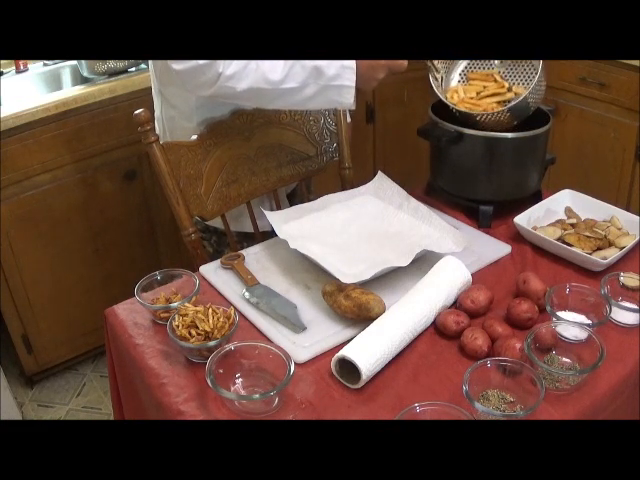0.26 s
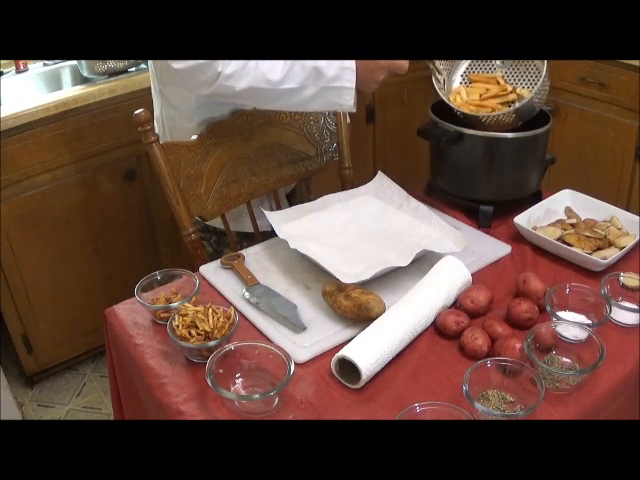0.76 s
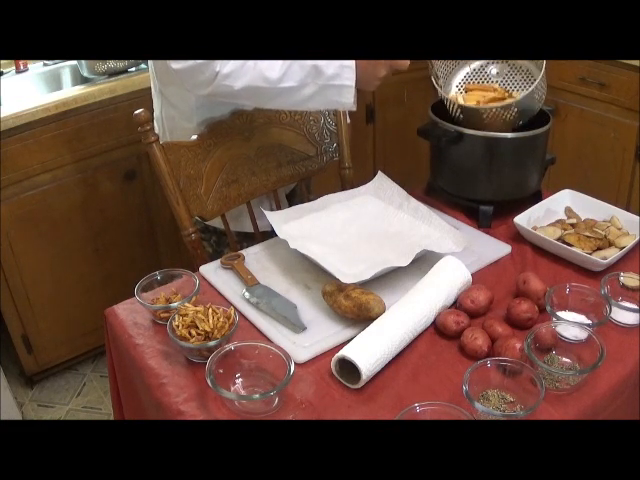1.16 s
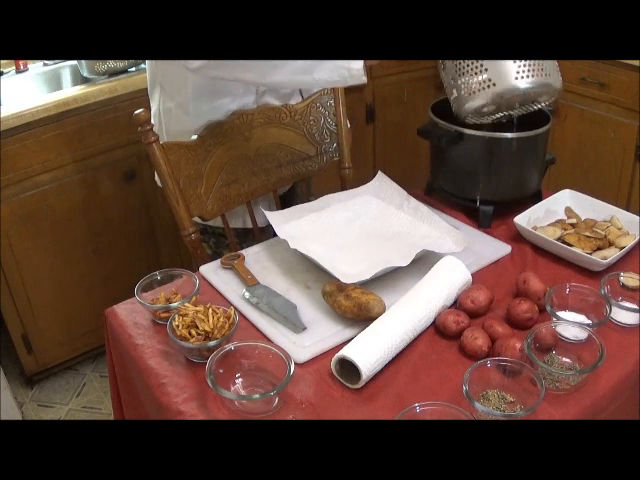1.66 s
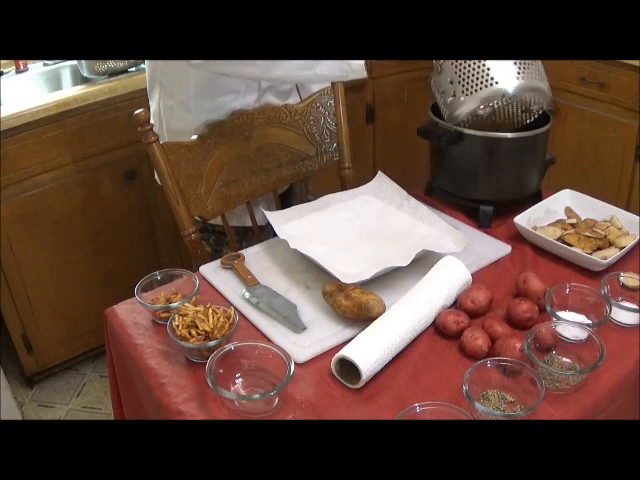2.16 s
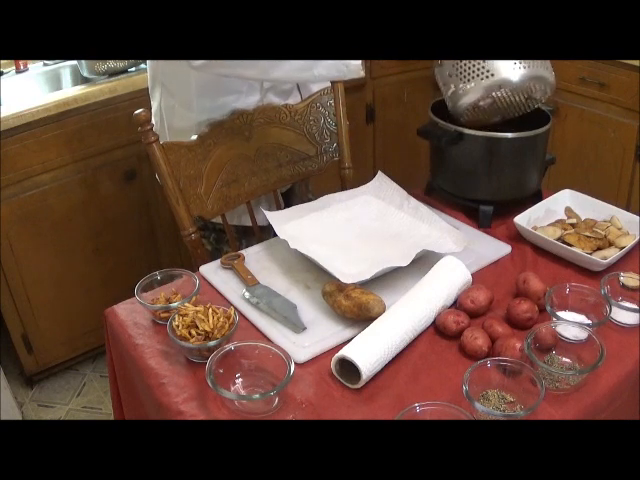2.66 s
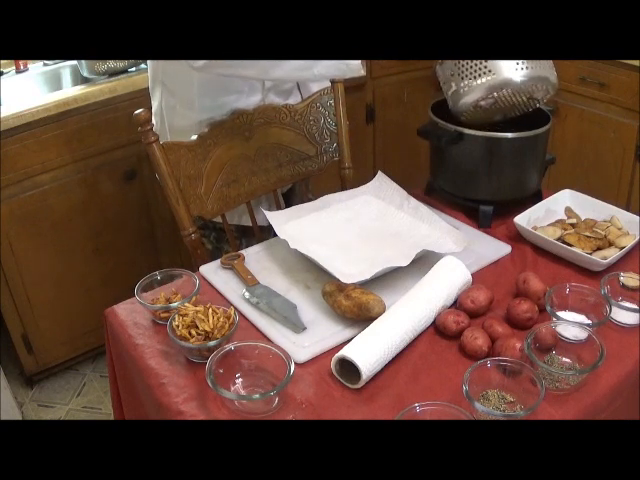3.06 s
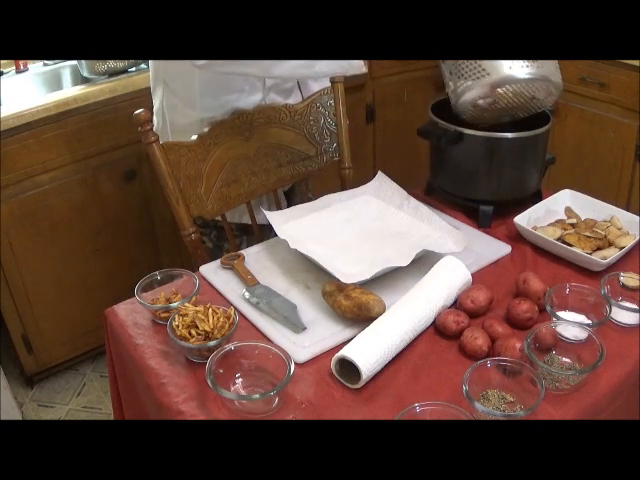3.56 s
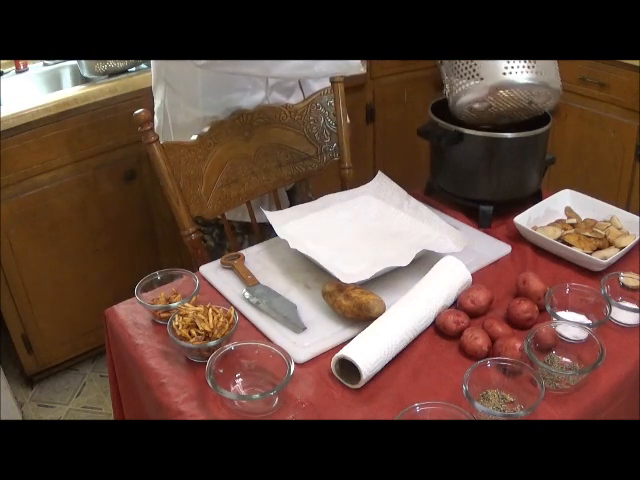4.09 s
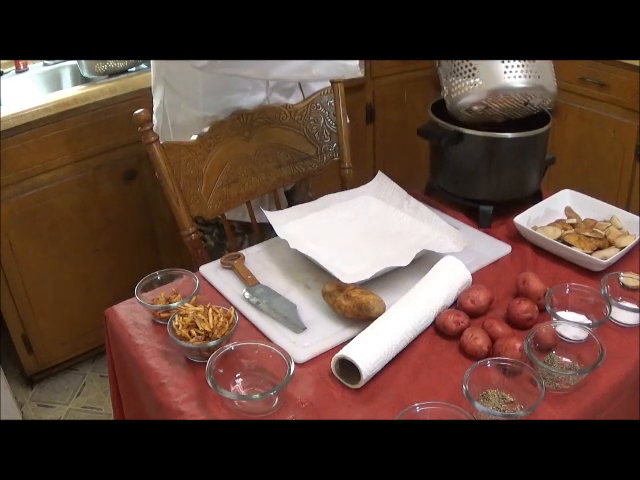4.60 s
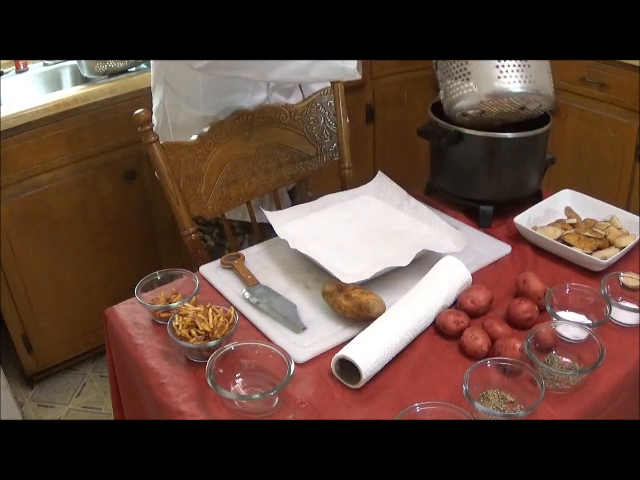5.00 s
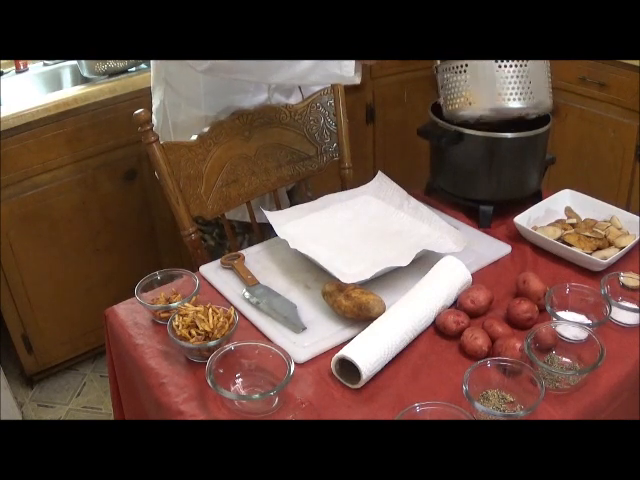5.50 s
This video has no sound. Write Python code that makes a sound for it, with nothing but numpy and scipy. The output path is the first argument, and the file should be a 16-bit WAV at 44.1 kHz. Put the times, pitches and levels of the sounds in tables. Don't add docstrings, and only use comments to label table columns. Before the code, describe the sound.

Fried potato sticks rattle in a perforated metal basket, tip into a deep pot with hollow knocks, then get shaken harder with bright clattering slaps.

```python
import sys
import numpy as np
from scipy import signal
from scipy.fft import rfft, irfft, next_fast_len
from scipy.io import wavfile
from scipy.ndimage import uniform_filter1d

SR = 44100
rng = np.random.default_rng(int(sys.argv[2]) if len(sys.argv) > 2 else 0)


def unload_audio(sound):
    columns = np.transpose(np.atleast_2d(sound))
    steps = np.round(np.clip(columns, -1, 1) * 32767)
    wavfile.write(sys.argv[1], SR, steps.astype(np.int16))


def field_ratio(decibels):
    return 10 ** (np.asarray(decibels, dtype=float) / 20)


N = 253115


def evened(x):
    return x / np.sqrt(np.mean(x ** 2) + 1e-20)


def read(points, hz, column=1):
    table = np.array(points, float)
    return np.interp(np.log(hz + 1), np.log(table[:, 0] + 1), table[:, column])


def curve(table):
    return np.interp(np.arange(N) / SR, *np.transpose(table), -150, -150)


def add(mix, s, sound):
    part = mix[round(s * SR):][:len(sound)]
    part += sound[:len(part)]


def high_pass(x, order, hz):
    return signal.sosfilt(signal.butter(order, hz, "high", fs=SR, output="sos"), x)


def colour(x, points):
    hz = abs(np.fft.fftfreq(8192, 1 / SR))
    log_gain = np.log(field_ratio(np.maximum(read(points, hz), -100)))
    taps = np.fft.ifft(np.exp(np.conj(signal.hilbert(log_gain)))).real[:3000]
    return signal.oaconvolve(x, taps / np.linalg.norm(taps))[:len(x)]


def resonate(x, hz, width):
    return signal.lfilter(*signal.iirpeak(hz, hz / width, SR), x)


def tipped():
    middle_s, move_s = 1.78, 0.34
    return np.clip((np.arange(N) / SR - middle_s) / move_s + .5, 0, 1)


# pitch_hz, density_db (per Hz)
AIR_SPECTRUM = [(15, -31), (60, -5), (125, -11), (165, -3.5), (210, -8), (500, -5), (1200, -9), (2050, -9),
                (2800, -10), (3600, -8.5), (4600, -9), (5700, -10.5), (9600, -16), (15500, -25)]
# pitch_hz, likeness (0 to 1)
AIR_LIKENESS = [(60, 0.98), (180, 0.75), (550, 0.53), (1650, 0.23), (4970, 0.65), (15000, 0.97)]


def air():
    level_db = -49
    frames, hz = N // 256 + 5, np.fft.rfftfreq(1024, 1 / SR)
    a, b, c, d, patches = rng.standard_normal((frames, 513, 5)).T
    patches = uniform_filter1d(uniform_filter1d(patches, 12, 0), 12, 1)
    same = np.clip(read(AIR_LIKENESS, hz), -1, .97)[:, None]
    left = a + 1j * b
    right = same * left + np.sqrt(1 - same ** 2) * (c + 1j * d)
    z = np.array([left, right]) * field_ratio(read(AIR_SPECTRUM, hz)[:, None] + evened(patches))
    return field_ratio(level_db) * evened(signal.istft(z, nperseg=1024, noverlap=768)[1][:, :N])


# pitch_hz, width_hz, level_db
HOUSING = [(2750, 580, -0.049), (4130, 340, -1), (4930, 120, 1.8)]
# pitch_hz, level_db
HUM_TONES = [(120, -76), (177, -71), (240, -71), (960, -69), (1320, -69)]


def lamp():
    snap_hz, buzz_db = 119.98, -56.5
    late_db = 2.5
    t = np.arange(N) / SR
    pulses = sum(np.cos(2 * np.pi * k * snap_hz * t) for k in range(15, 46))
    buzz = sum(field_ratio(db) * resonate(resonate(pulses, hz, width), hz, width) for hz, width, db in HOUSING)
    hum = np.zeros(N)
    for hz, db in HUM_TONES:
        waver = 1 + 1.72 * evened(uniform_filter1d(rng.standard_normal(N), 3000))
        hum += field_ratio(db) * waver * np.sin(2 * np.pi * hz * t)
    return field_ratio(buzz_db + late_db * tipped()) * evened(buzz) + hum


# pitch_hz, decay_t60_s, level_db
WALL_ECHOES = [(100, 0.92, -13), (400, 0.47, 1), (980, 0.34, -3), (2140, 0.38, 0.5), (5570, 0.35, -5.5),
               (8500, 0.17, -1.5), (12700, 0.22, -2.5)]
# pitch_hz, share (0 to 1)
SHARED_ECHOES = [(300, 0.92), (600, 0.94), (1200, 0.69), (2500, 0.73), (5000, 0.57), (9000, 0.74),
                 (11000, 0.95)]


def kitchen(x, count=3):
    out, size = np.zeros((2, N)), SR // 3
    for k in range(count):
        taps = np.zeros((3, size))
        at = np.arange(90, size - 20, 20) + rng.integers(0, 20, (3, (size - 91) // 20))
        np.put_along_axis(taps, at, rng.choice([-1., 1.], at.shape), 1)
        hz, t, z = signal.stft(taps, SR, nperseg=256)
        shared = np.clip(read(SHARED_ECHOES, hz), 0, 1)[:, None]
        z = shared * z[2] + np.sqrt(1 - shared ** 2) * z[:2]
        t60 = read(WALL_ECHOES, hz)[:, None]
        db = read(WALL_ECHOES, hz, column=2)[:, None]
        z *= field_ratio(db - 60 * t / t60) / np.sqrt(t60 * 160)
        echoes = signal.istft(z, SR, nperseg=256)[1]
        turn = np.sqrt(2 / count) * np.cos(np.pi * (np.arange(N) / SR * 3.1 + k / count))
        out += signal.oaconvolve((x * turn)[None], echoes, axes=1)[:, :N]
    return out


# start_s, effort_db
EFFORT_CURVE = [(0, -38.5), (.11, -44.5), (.82, -47), (.99, -36), (1.13, -45.5), (1.26, -73), (1.7, -56),
                (1.93, -32), (2.08, -45), (2.4, -49), (2.81, -38.5), (3.32, -33.5), (3.72, -27.5),
                (4.27, -32.5), (4.46, -32.5), (4.62, -35), (5.2, -28), (5.44, -49.5)]


def low_effort_db():
    upright_db, tipped_db = -13.5, -6
    return curve(EFFORT_CURVE) + upright_db + (tipped_db - upright_db) * tipped()


# pitch_hz, density_db (per Hz)
COUNTER_SPECTRUM = [(30, -37), (80, -12.5), (165, 1), (250, -5), (420, -14), (800, -45)]


def rumble():
    return colour(rng.standard_normal(N) * field_ratio(low_effort_db() - 21.0), COUNTER_SPECTRUM)


# start_s, peak_db, pitch_hz, decay_t60_s
POT_AND_RIM_KNOCKS = [(0.684, -38.5, 690, 0.13), (.703, -39, 700, .1), (0.725, -31.5, 660, 0.11),
                      (.748, -39, 770, .12), (1.571, -41, 1340, 0.1), (1.902, -13.5, 665, 0.046),
                      (1.917, -15.5, 765, 0.14), (2.019, -19.5, 800, 0.17), (2.186, -17, 970, 0.043),
                      (2.209, -27, 940, 0.21), (2.308, -32.5, 1226, 0.086), (1.932, -15.5, 3290, 0.066),
                      (1.9, -24, 3000, 0.088), (1.985, -18, 1500, 0.073), (1.95, -19, 1200, 0.081),
                      (2.03, -21, 1400, .06), (4.25, -21.5, 985, .12), (2.615, -30, 985, .12),
                      (2.735, -27, 985, .08), (3.36, -22, 985, 0.12), (3.385, -21.5, 760, 0.088),
                      (3.812, -17.5, 990, 0.18), (3.3, -19, 1400, 0.11), (3.165, -21.5, 985, 0.15),
                      (2.205, -23.5, 984, 0.11), (2.006, -22, 2344, 0.051), (4.054, -16, 1190, 0.046),
                      (4.192, -26, 990, 0.17), (2.71, -21, 870, 0.034), (5.5908, -32, 1233, 0.07),
                      (5.591, -26.5, 750, 0.03), (5.601, -37, 920, .05), (5.613, -35, 1200, 0.056),
                      (5.591, -32, 1600, 0.027), (5.604, -28.5, 1220, 0.055)]
# start_s, peak_db, pitch_hz, decay_t60_s
COUNTER_THUMPS = [
    (1.896, -29, 359, 0.25),
    (1.929, -35.5, 331, 0.56),
    (1.948, -35.5, 66, 0.6),
    (2.021, -19.5, 371, 0.081),
    (2.049, -33, 152, 0.38),
    (2.191, -59, 352, 0.19),
    (5.706, -39, 190, 0.045),
]


def knocks():
    out, t = np.zeros(N), np.arange(SR // 3) / SR
    neighbours = [(0.732, -4.0), (0.595, -14.0), (1.1, -8.0)]
    for s, db, hz, t60 in POT_AND_RIM_KNOCKS + COUNTER_THUMPS:
        near = sum(field_ratio(d - 60 * t / t60) * np.sin(2 * np.pi * hz * k * t) for k, d in neighbours)
        rise = np.minimum(t * hz / 1.46, 1)
        decay = field_ratio(db - 7.0 - 60 * t / t60)
        add(out, s, decay * rise * (np.sin(2 * np.pi * hz * t) + near))
    return high_pass(out, 2, 50)


# start_s, peak_db, pitch_hz
EDGE_SNAPS = [(0.0282, -14.5, 6370), (0.194, -12.5, 5900), (0.378, -14.5, 2330), (0.9252, -3.5, 6240),
              (0.9335, -5.5, 6040), (1.8944, -21, 3800), (2.1093, -14, 5640), (2.307, -16, 4220),
              (2.5052, -11.5, 3370), (2.9958, -13, 3340), (3.0732, -14, 3340), (3.1546, 0, 5900),
              (3.332, -5, 5840), (3.3547, -15, 3210), (3.3664, -9, 4500), (3.43, -8, 4160),
              (3.5258, -6, 3100), (3.546, -5, 9170), (3.5677, -20, 4670), (3.6523, -7, 3700),
              (3.6932, -9, 2750), (3.7088, -5, 4250), (3.7939, -18, 3420), (3.851, -14, 1800),
              (3.874, -5, 3250), (3.8908, -9, 3230), (3.9438, -1, 5100), (4.0566, -24, 2220),
              (4.0767, -3, 3700), (4.0948, -8, 6520), (4.1614, -22, 4070), (4.1908, -6, 3620),
              (4.255, -5, 3400), (4.342, -9, 3100), (4.4054, -2, 3630), (4.438, -15, 3190),
              (4.4803, -17, 3660), (4.4924, -18, 3640), (4.5539, -16.0, 8140), (4.5878, -2, 3400),
              (4.7044, -10, 3800), (4.7655, -17.0, 3960), (4.803, -8, 6240), (4.87, -14.0, 4390),
              (4.9708, -15, 5280), (5.016, -7, 3510), (5.1393, -10, 5200), (5.166, -2, 8800),
              (5.193, -19, 2930), (4.2399, -2.5, 3100), (4.4165, -2, 4540), (3.7495, -9, 5000),
              (5.59, -27, 1410), (5.2044, -7, 4500), (4.024, -7, 4200), (4.0455, -8, 3740),
              (4.06, -2, 5500), (1.9865, -4, 4200), (2.0062, 1, 4500), (1.9675, 2, 3880)]


def snaps():
    level_db, cycles = -7, 2.3
    out, t = np.zeros(N), np.arange(300) / SR
    for s, db, hz in EDGE_SNAPS:
        add(out, s, field_ratio(db + level_db) * np.exp(-t * hz / cycles) * np.sin(2 * np.pi * hz * t))
    return high_pass(out, 2, 900)


# start_s, peak_db, brightest_hz, spread_s
WALL_THROWS = [(0.795, -18.5, 4610, 0.0037), (0.8037, -18.5, 5140, 0.038), (.861, -19.5, 5140, 0.012),
               (1.0082, -20, 5450, 0.011), (1.1056, -21, 6550, 0.015), (1.8611, -26, 3350, 0.013),
               (1.9319, -8, 3300, 0.01), (2.0426, -4.5, 3800, 0.0086), (2.388, -25, 3060, 0.018),
               (2.6841, -23.5, 3020, 0.01), (2.7922, -14, 3950, 0.011), (2.9701, -11.5, 3420, 0.0047),
               (3.0566, -19, 3720, 0.014), (3.073, -18.5, 4300, 0.0059), (3.1522, -9, 3550, 0.016),
               (3.5055, -6.5, 5240, 0.0086), (3.749, -14.5, 5070, 0.007), (3.8728, -4.5, 2530, 0.014),
               (4.145, -17, 3470, 0.0066), (4.2515, -8.5, 3340, 0.023), (4.4159, -11.5, 3360, 0.042),
               (4.438, -10.5, 3350, 0.018), (4.5221, -21, 4470, 0.05), (4.5451, -17, 5950, 0.022),
               (4.587, -12.5, 3140, 0.03), (4.6811, -21, 3570, 0.011), (4.837, -17, 5000, 0.05),
               (4.982, -10, 3350, 0.019), (5.165, -12.5, 3140, 0.0087), (5.2049, -9, 3080, 0.011)]
# start_s, peak_db, brightest_hz, spread_s
BOTTOM_DROPS = [(0.0265, -23.5, 5900, 0.0036), (0.063, -22.5, 3280, 0.016), (0.1323, -31, 2530, 0.0076),
                (0.2505, -23, 3500, 0.027), (.431, -24.5, 5050, 0.022), (0.6125, -26, 3550, 0.019),
                (0.6797, -27.5, 3900, 0.0098), (0.832, -35, 6090, .02), (.9776, -19.5, 3820, 0.021),
                (1.571, -35.5, 3740, 0.019), (1.7223, -31.5, 4330, 0.019), (2.1867, -18, 2950, 0.024),
                (2.3368, -31, 2900, .012), (2.583, -24, 3670, .0076), (2.6045, -20.5, 5200, 0.0092),
                (2.727, -21.5, 6500, 0.047), (2.9043, -23.5, 4460, 0.011), (2.9958, -19.5, 3160, 0.032),
                (3.3524, -15, 3800, 0.018), (3.7827, -10.5, 3150, 0.0045), (3.81, -16, 3460, 0.058),
                (4.024, -15, 3330, 0.01), (4.049, -10, 2640, 0.015), (4.1879, -15.5, 4600, 0.0063),
                (4.234, -11.5, 3050, 0.011), (4.9593, -16.5, 3860, 0.012), (5.0141, -23, 3770, 0.005),
                (5.1394, -17.5, 3160, 0.017)]
# start_s, peak_db, brightest_hz, spread_s
HIGH_GLANCES = [(0.192, -19, 6000, 0.015), (.5337, -12.5, 5760, 0.0038), (.897, -21, 4000, 0.02),
                (0.9218, -16, 6000, 0.0081), (0.932, -25, 6850, 0.0083), (1.1194, -32, 4500, .0076),
                (1.9665, -12, 4130, 0.034), (1.9912, -11.5, 4040, 0.043), (2.849, -21, 3140, 0.019),
                (3.266, -18.5, 5000, 0.017), (3.5273, -9.5, 3590, 0.0078), (3.5671, -15, 3180, 0.011),
                (3.9423, -10.5, 4560, 0.024), (4.0936, -10.5, 4540, 0.0082), (4.2906, -17.5, 3670, 0.19),
                (4.6278, -12.5, 3530, 0.0059), (4.7023, -22, 2950, 0.009), (4.799, -8.5, 3550, 0.027),
                (5.415, -29.5, 3540, 0.014)]
# start_s, peak_db, mode_hz, clink_db (against the blow)
RIM_CLINKS = [(0.3745, -17.5, 3670, -20), (1.1448, -46, 2480, 8), (1.8922, -14.5, 3790, -13),
              (2.173, -21, 3030, -8), (2.3066, -29, 3800, -12), (2.407, -28.5, 4910, -10),
              (2.504, -20, 3630, -17), (3.3296, -7.5, 6400, -10.5), (3.4278, -20, 4630, -3),
              (3.4966, -14, 3720, -4), (3.6929, -13.5, 2490, -17), (3.707, -9, 3470, -17),
              (4.3408, -30, 4550, 4), (4.357, -17.5, 6200, 0), (4.403, -12, 3350, -5.5),
              (4.764, -17.5, 3580, -6), (4.9093, -14.5, 3470, -8), (5.1233, -14.5, 3130, -4.5),
              (5.2288, -26, 3130, 8), (5.3035, -23, 3130, -6), (5.3237, -24, 3130, -4),
              (5.336, -25.5, 3130, -11)]
# start_s, peak_db, mode_hz, clink_db (against the blow)
STRAY_PIECES = [(1.9248, -13, 3290, -12), (1.9794, -5, 3900, -7), (2.0833, -19, 6197, 3.5),
                (2.0498, -13, 3690, 1), (3.2339, -41, 4590, -12), (3.5591, -12.5, 3180, -12),
                (3.6498, -18, 3660, -2), (3.793, -19, 4500, -8), (3.8488, -36, 2430, -17),
                (3.89, -23, 3270, -12), (3.9839, -14.5, 4570, -12), (4.0742, -10, 3570, -15),
                (4.158, -23, 4500, -12), (4.055, -10, 2390, -10), (4.3098, -18, 3550, -10),
                (4.7174, -23, 6350, -14), (4.869, -19, 4260, -20), (4.889, -19, 3900, -10),
                (5.0429, -16, 3120, -8), (5.0219, -11.5, 3800, -11), (5.2653, -16, 3650, -17)]


def slaps():
    landings = []
    for heaps, ring_db, clink_db in [(WALL_THROWS, -14.5, -20), (BOTTOM_DROPS, -8.5, -22),
                                     (HIGH_GLANCES, -20, -18)]:
        landings += [(*row, ring_db, clink_db) for row in heaps]
    for pieces, spread_s, ring_db in [(RIM_CLINKS, 0.017, -12.5), (STRAY_PIECES, 0.0054, -19.5)]:
        landings += [(s, db, hz, spread_s, ring_db, clink_db) for s, db, hz, clink_db in pieces]
    return landings


def hush_db():
    flight_s, share, heap_over_db = 0.076, 0.2, 12.5
    s, db = np.transpose(slaps())[:2]
    over_db = db - np.interp(s, *np.transpose(EFFORT_CURVE)) - heap_over_db
    depth = np.zeros(N)
    depth[(s * SR).astype(int)] = share * np.maximum(over_db, 0)
    keep = np.exp(-1 / (flight_s * SR))
    return -signal.lfilter([1], [1, -keep], depth[::-1])[::-1]


def ticks(shape, per_s, spread_db):
    chance = rng.random((shape, 3))
    size = field_ratio(-spread_db * np.log(1 - .995 * chance[:, 0])) * np.sign(chance[:, 1] - .5)
    return evened(size * (chance[:, 2] < per_s / SR))


# start_s, force_db
HEAP_SLIDE = [
    (1.885, -48),
    (1.893, -35),
    (1.909, -35),
    (1.983, -18),
    (2.061, -22),
    (2.135, -42),
    (2.17, -35.5),
]


def rattle_and_slide():
    stir = rng.standard_normal(N)
    clumps = field_ratio(0.81 * evened(uniform_filter1d(stir, 250)))
    patches = field_ratio(3.5 * evened(uniform_filter1d(stir[::-1], 900)))
    hush, effort_db = hush_db(), curve(EFFORT_CURVE)
    loose = ticks(N, per_s=1600, spread_db=4.0) * clumps * field_ratio(hush - 3)
    crumbs = ticks(N, per_s=12000, spread_db=6.0) * field_ratio(-3.0 + 0) * field_ratio(0.31 * hush)

    crust_db, follows, full_db = -7, 1.19, -21.5
    crust = field_ratio(crust_db + full_db + follows * (effort_db - full_db))
    sizzle_db, cools_db_per_s = -52, 1
    sizzle = field_ratio(sizzle_db - cools_db_per_s * np.arange(N) / SR)

    slide_db = curve(HEAP_SLIDE)
    heaped = ticks(N, per_s=9900, spread_db=5.0) * field_ratio(-4.5)
    slide = heaped * field_ratio(slide_db)
    low_slide = heaped * field_ratio(np.minimum(slide_db - 10, -41))
    crust_slide = heaped * field_ratio(slide_db - 0.5)

    shell = loose * field_ratio(effort_db) + slide
    low = loose * patches * field_ratio(low_effort_db() + 0.5) + low_slide
    top = field_ratio(-1.0) * loose * crust + crumbs * np.hypot(crust, sizzle) + crust_slide
    bowed = heaped * field_ratio(np.minimum(slide_db, -30))
    clinks = field_ratio(13) * resonate(bowed, 3600, 30)
    clinks += field_ratio(-8) * resonate(slide, 2350, 31) + field_ratio(-17) * resonate(slide, 2700, 60)
    return shell, low, top, clinks


SHELL_PITCHES = [2130, 2344, 2477, 2660, 3050, 3122, 3290, 3540, 3708, 3790, 4258, 4580, 4760, 4900, 5300,
                 6000, 6197, 6360]


def contacts():
    shell, low, top, clinks = rattle_and_slide()
    t, up = np.arange(5000) / SR, 1 - tipped()
    showers = ticks(5000 * 120, per_s=7000, spread_db=3.5).reshape(120, 5000)
    largest = 1.64
    showers = largest * np.tanh(showers / largest)
    for (s, db, hz, spread, ring_db, clink_db), shower in zip(slaps(), showers):
        edge = np.exp(-t / 0.00097)
        heap = np.exp(-t / max(spread, .001))
        shape = 0.63 * edge + 0.88 * heap
        blow = shape * np.r_[1.8, shower[1:]]
        blow *= field_ratio(db - 12) * np.linalg.norm(shape) / np.linalg.norm(blow)
        add(shell, s, 0.71 * blow + 0.5 * resonate(blow, hz, 0.6 * hz))
        upright_db = -7 * up[round(s * SR)]
        add(low, s + 0.002974, blow * field_ratio(ring_db + 5.5 + upright_db))
        crusts = np.sign(shower) * abs(shower) ** 0.53
        add(top, s, field_ratio(db - 10.5) * crusts * (field_ratio(-23.0) * edge + field_ratio(-4.0) * heap))
        mode_hz = min(SHELL_PITCHES, key=lambda f: abs(f - hz))
        add(clinks, s, field_ratio(clink_db + 25.0) * resonate(blow, mode_hz, 110))
    return shell, low, top, clinks


def ring(drive, modes_hz, modes, place_db, count=5, size=96):
    t = np.arange(SR // 4) / SR
    place = rng.integers(0, count, N // 96 + 1).repeat(size)[:N]
    db, t60 = np.transpose(modes)[:, :, None]
    out = np.zeros(N)
    for k, (weight, detune, sign) in enumerate(rng.standard_normal((count, 3, len(modes), 1))):
        hz = np.array(modes_hz)[:, None] * (1 + .004 * detune)
        level = np.sign(sign) * field_ratio(db + place_db * weight - 60 * t / t60)
        body = (level * np.sin(2 * np.pi * hz * t)).sum(0)
        out += signal.oaconvolve(drive * (place == k), body / np.linalg.norm(body))[:N]
    return out


def wall(drive, points, t60, count=12):
    place = rng.integers(0, count, N // 64 + 1).repeat(64)[:N]
    bodies = rng.standard_normal((count, 1024)) * field_ratio(-60 * np.arange(1024) / SR / t60)
    bodies[:, 0] = 7.6
    rung = np.zeros(N)
    for k, body in enumerate(bodies):
        rung += signal.oaconvolve(drive * (place == k), body / np.linalg.norm(body))[:N]
    return colour(rung, points)


# level_db, decay_t60_s
SHELL_MODES = [(-21, 0.08), (5, 0.084), (10, 0.055), (3, 0.12), (10, 0.024), (12, 0.053), (-7, 0.064),
               (16.5, 0.025), (6, 0.02), (14.5, 0.034), (11, 0.012), (9, 0.12), (-2, 0.091), (6.5, 0.13),
               (6, 0.09), (-20, 0.17), (11, 0.069), (5.5, 0.074)]
POT_PITCHES = [370, 511, 738, 770, 982, 1008, 1083, 1213, 1262, 1305, 1610, 1661]
# level_db, decay_t60_s
POT_MODES = [(-26.5, 0.25), (-16, 0.12), (-9, 0.12), (-10.5, 0.082), (0.5, 0.12), (-5, 0.12), (-5.5, 0.12),
             (-3.5, 0.13), (-5, 0.1), (-6, 0.11), (-34, 0.25), (-3.5, 0.033)]
# pitch_hz, density_db (per Hz)
WALL_TICK = [(60, -32), (250, -23.5), (550, -14.5), (1000, -7.5), (1500, -8), (2000, -7.5), (2450, -4),
             (3300, -4.5), (4300, -3), (5200, -1.5), (6300, -1.5), (7400, -8), (9000, -18), (13000, -40)]
# pitch_hz, density_db (per Hz)
CRUST_CRISP = [(4000, -56), (7000, -4), (8000, -2), (9300, 3.5), (10800, -2.5), (12500, -11), (15500, -15)]
# pitch_hz, density_db (per Hz)
POT_HOLLOW = [(300, -34), (750, -10.5), (1000, -1), (1350, -1), (1800, -8.5), (4000, -31.5)]


def basket():
    shell, low, top, clinks = contacts()
    up = 1 - tipped()
    metal = field_ratio(-0.5) * wall(shell, WALL_TICK, t60=0.029) + clinks
    metal += field_ratio(-5.5) * ring(shell, SHELL_PITCHES, SHELL_MODES, place_db=-0.5)
    metal += field_ratio(-8) * up * resonate(metal, 1830, 630)
    pot = ring(low * field_ratio(2.5 * up - 0.5), POT_PITCHES, POT_MODES, place_db=2.0, size=250)
    pot += wall(low * field_ratio(-8.5 + 12 * up), POT_HOLLOW, t60=0.094, count=4)
    return high_pass(metal + pot, 2, 420) + wall(top, CRUST_CRISP, t60=0.02, count=14)


# pitch_hz, left_minus_right_db
STEREO_LEAN = [(60, 1), (180, 0), (550, 1.5), (1650, 2), (4970, 0.7), (15000, 0.5)]


def scene():
    near = basket() + snaps() + knocks() + rumble()
    size = next_fast_len(N)
    lean = field_ratio(read(STEREO_LEAN, np.fft.rfftfreq(size, 1 / SR)) / 2)
    heard = rfft(near + kitchen(near), size, axis=1) * np.array([lean, 1 / lean])
    return irfft(heard, size, axis=1)[:, :N] + air() + lamp()


def low_pass(x):
    return signal.sosfilt(signal.butter(12, 16800, fs=SR, output="sos"), x)


def record(dry):
    limit, edge_hz = .55, 15730
    rounded = limit * np.tanh(dry / limit)
    edge = signal.firwin(801, edge_hz, window=("kaiser", 5), fs=SR)
    finished = signal.oaconvolve(rounded, edge[None], "same")
    return low_pass(finished)


dry = scene()
out = record(dry)
unload_audio(out)
```